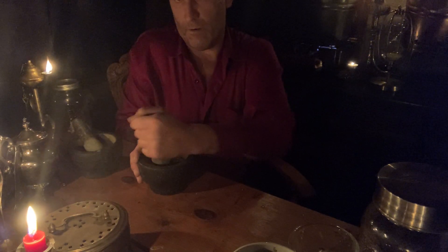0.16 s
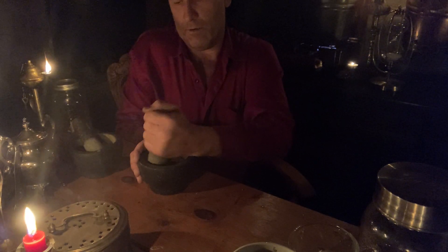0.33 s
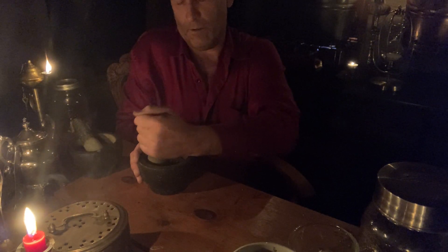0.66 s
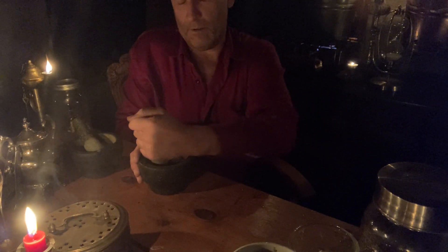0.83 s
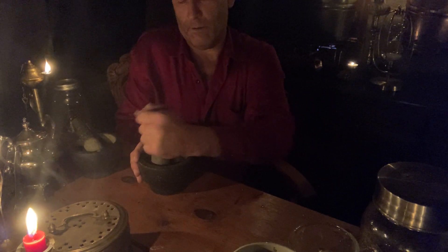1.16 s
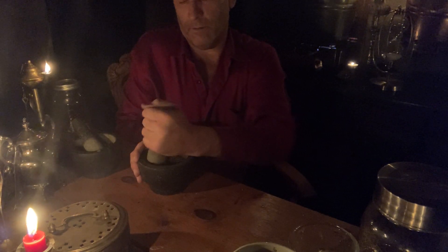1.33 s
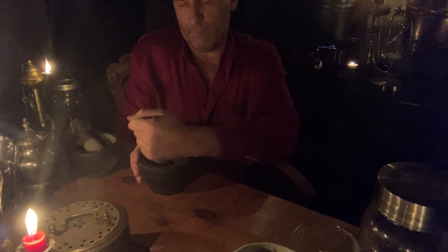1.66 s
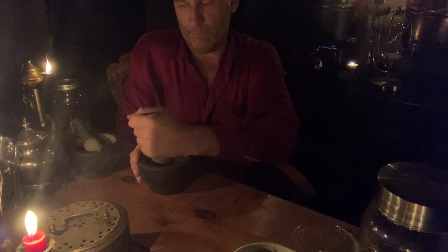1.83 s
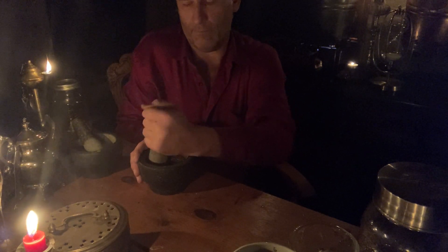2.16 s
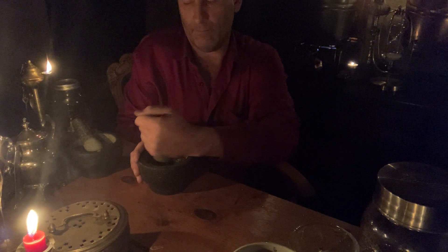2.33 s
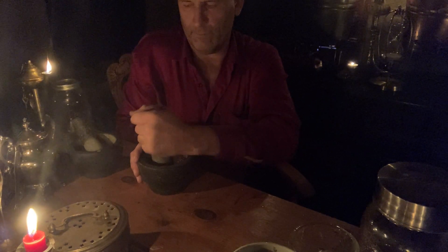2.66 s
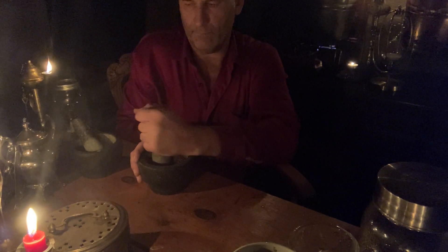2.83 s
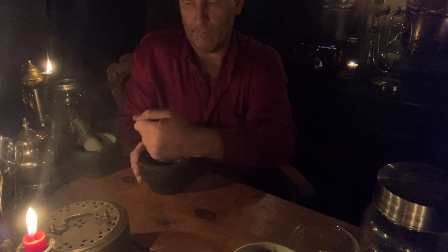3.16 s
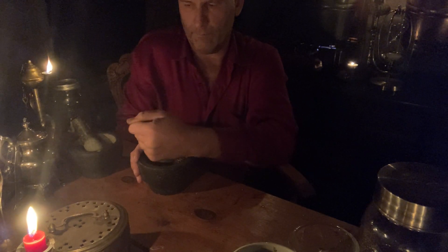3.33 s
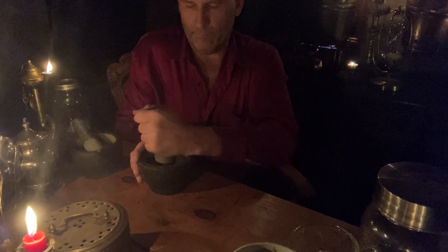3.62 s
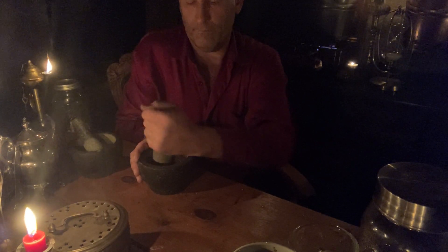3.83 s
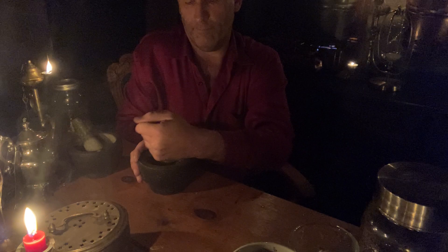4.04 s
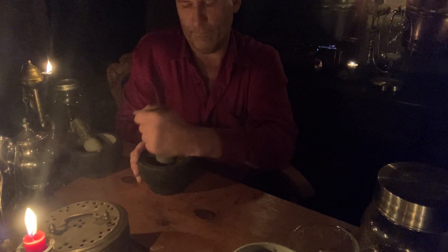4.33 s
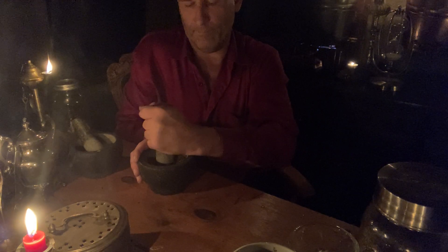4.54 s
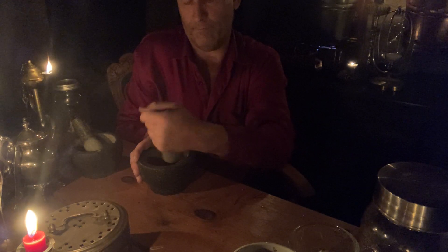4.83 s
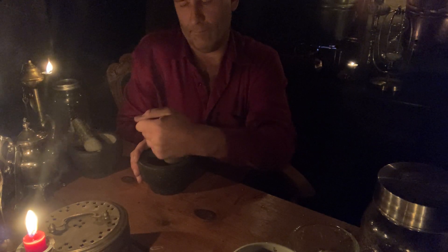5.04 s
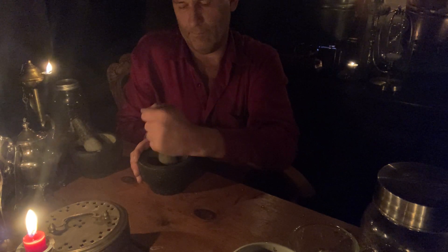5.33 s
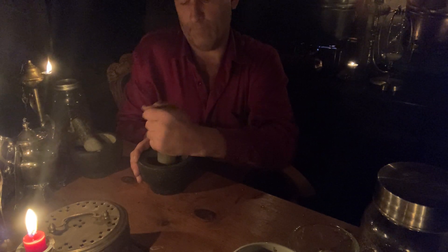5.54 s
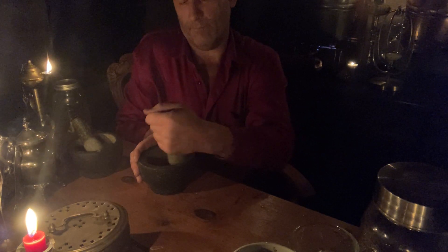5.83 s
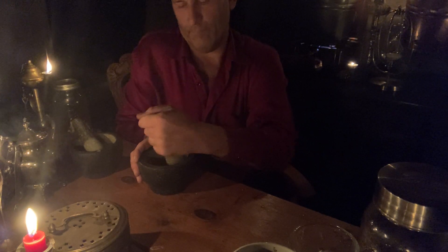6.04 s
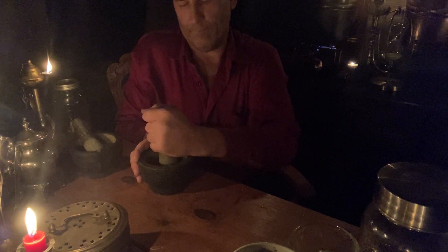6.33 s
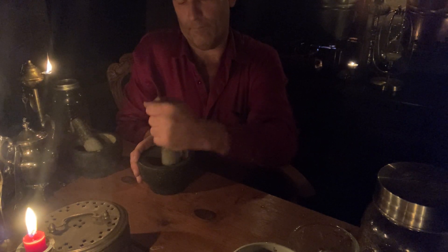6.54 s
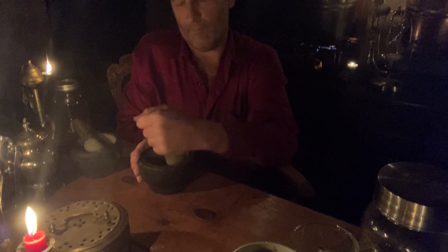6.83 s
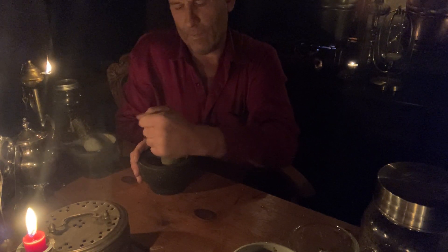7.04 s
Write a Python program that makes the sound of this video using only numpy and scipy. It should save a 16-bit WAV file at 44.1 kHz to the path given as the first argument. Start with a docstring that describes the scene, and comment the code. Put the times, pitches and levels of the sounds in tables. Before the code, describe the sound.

Close, dry grinding of brittle spice under a heavy stone pestle, in irregular pushes with short gaps. Each push brings coarse scraping, fine crackle and a low table rumble. Dull bumps and occasional stone clacks with quick rebounds interrupt it, sharpest around five and six seconds and in a clattering cluster near the end. Brief high stony squeaks appear. Small quiet room, soft air and faint high hiss.

```python
"""Grinding spice in a stone mortar

A stone pestle grinds dry spice in a stone mortar on a wooden table, in uneven strokes, in a quiet room.
Tiny slips shake the mortar and the table top, crushed powder crackles, and bare stone makes the pestle sing.
Now and then the pestle knocks on the bowl and rebounds, or a seed cracks; room air and a faint hiss lie under it.
Slips and breaking grains are random tiny blows, played through rings and short bursts of shaped noise."""
import sys
import numpy as np
from scipy import signal
from scipy.fft import rfft, irfft
from scipy.io import wavfile
from scipy.ndimage import uniform_filter1d

SR = 44100
rng = np.random.default_rng(int(sys.argv[2]) if len(sys.argv) > 2 else 0)


def to_wav(sig):
    """Store sig (one row per channel, or 1-D mono) as 16-bit WAV at the path in sys.argv[1].

    Samples outside -1..1 are clipped; the rate is SR.
    """
    pcm = np.clip(np.atleast_2d(sig), -1, 1) * 32767
    pcm = np.round(pcm).astype(np.int16)
    wavfile.write(sys.argv[1], SR, pcm.T)  # frames by channels


N = 316638  # length of the scene in samples
RING_N = 32768  # length of one ring in samples
TIME = np.arange(N) / SR  # seconds since the start of the scene
AGE = np.arange(RING_N) / SR  # seconds since a blow

# The pestle's own bending modes. Each row: pitch in Hz, relative level in dB, time to fall by 60 dB in seconds.
PESTLE_MODES = [(4155, -3.5, 0.15), (4190, 3, 0.11), (8900, -23, 0.079)]


def grinding(table, bowl):
    """Slips under pressure shake the table, coarse grit rattles the bowl, and powder crackles as it is crushed."""
    pressure, grit, crushing = effort()
    catch = uneven(rate=62, depth_db=3.0)
    slips = grains(rate=480, spread_db=4.5) * catch
    breaking = grains(rate=2400, spread_db=1.0) * catch

    shaking = undb(-2.0) * driven(slips * pressure, thud(table))
    rattle = undb(-1.5) * driven(slips * grit, clack(bowl, hard_hz=1750))
    crackle = undb(1.0) * driven(breaking * crushing, snap())

    # the arm's weight rocks the whole table: a low rumble that follows the pressure
    rumble = [(15, -20), (45, 2.5), (75, -9), (115, -1), (170, 0), (300, -57.5)]  # Hz, relative dB
    sway = noise(rumble, width=0.42, size=N) * (pressure / undb(-51)) ** 0.75
    return shaking + rattle + crackle + undb(-58.0) * sway


def effort():
    """Pressure on the spice, and the grit rattle and crushing that go with it, as gains over time."""
    # The pestle bears down on the spice.
    # Each row: start in seconds, length in seconds, pressure in dB, change of pressure by the end in dB.
    strokes = [(0.0, 0.16, -50, 0), (0.305, .02, -57, -0.5), (0.537, 0.14, -51.5, 4.5),
               (0.817, 0.31, -49, -1), (1.182, 0.021, -53, -0.5), (1.429, 0.12, -47, -2),
               (1.678, 0.39, -53, 3), (2.636, 0.21, -47, -7), (3.395, 0.25, -49.5, 1.5),
               (3.72, 0.068, -56.5, 2), (4.291, 0.22, -45.5, -2.5), (4.66, 0.15, -61.5, -12),
               (5.121, .33, -52, 5), (6.05, .03, -50.5, -3), (6.212, 0.27, -43, -20.5),
               (6.99, 0.16, -47.5, -2.5)]
    # The pestle skims lightly along the wall.
    # Each row: start in seconds, length in seconds, grit level in dB, change by the end in dB.
    skims = [(2.138, 0.27, -60.5, -10)]
    # The pestle bites into a heap of unbroken spice. Each row: time of the peak in seconds, level in dB.
    bites = [(0.0, -56), (.82, -54), (1.67, -56.5), (2.655, -56), (3.42, -61.5), (3.59, -63.5),
             (4.31, -56.5), (5.16, -59.5), (5.291, -56), (6.05, -61.5), (6.21, -55), (7.04, -58)]
    press_attack_s, press_release_s = 0.075, 0.066  # time to rise or fall by 20 dB
    bite_attack_s, bite_release_s = 0.14, 0.12  # time to rise or fall by 20 dB
    resting_db = -72  # the pestle's own weight, always there
    grit_db, powder_db = -11.5, -19  # grit rattle and crackle of ground powder, relative to the pressure

    pressing = [swell(*row, press_attack_s, press_release_s) for row in strokes]
    pressure = undb(resting_db) + np.max(pressing, axis=0)
    skimming = sum(swell(*row, press_attack_s, press_release_s) for row in skims)
    biting = np.max([swell(s, 0, db, 0, bite_attack_s, bite_release_s) for s, db in bites], axis=0)

    grit = np.hypot(undb(grit_db) * pressure, skimming)
    crushing = np.hypot(undb(powder_db) * pressure, biting)
    return pressure, grit, crushing


def uneven(rate, depth_db):
    """The pestle catches and slides: a gain that wanders many times a second."""
    steps = rng.standard_normal(N // 100)
    gain = undb(depth_db * np.interp(TIME * rate, np.arange(len(steps)), steps))
    return gain / rms(gain)


def swell(s, length, db, change_db, attack, release):
    """Gain of one gesture: it rises, holds with a steady drift, and dies away."""
    held = np.clip((TIME - s) / max(length, .001), 0, 1)  # 0 at the start, 1 at the end
    before = np.maximum(s - TIME, 0) / attack
    after = np.maximum(TIME - s - length, 0) / release
    return undb(db + change_db * held - 20 * (before + after))


def singing(pestle):
    """Stick and slip on bare stone keeps the pestle's modes going."""
    # Bare stone rubs on stone.
    # Each row: start in seconds, length in seconds, level in dB relative to the other rubs.
    rubs = [(0.475, .008, -66), (0.52, 0.034, -64), (0.614, 0.076, -61), (1.435, 0.016, -62),
            (1.474, 0.043, -66.5), (5.925, .005, -52), (6.8, .07, -61.5)]
    attack_s, release_s = 0.013, 0.018  # time to rise or fall by 20 dB
    rub = sum(swell(s, length, db, 0, attack_s, release_s) for s, length, db in rubs)
    slips = grains(rate=430, spread_db=2.5)
    return undb(5.5) * driven(slips * rub, ring(pestle))


def knocks(table, bowl, pestle):
    """Each blow rings table, bowl and pestle; a breaking seed lets the pestle drop with a small thud."""
    # The pestle knocks on the bowl and rebounds. Each row: start in seconds, thud in dB, clack in dB,
    # hardness of the contact as a corner in Hz, thud of the rebound in dB. Levels are before the trims in blow().
    hits = [(.436, -59, -46.5, 1700, -58), (.458, -30.5, -49, 1090, -40.5), (1.443, -35.5, -43, 1680, -48),
            (1.501, -48, -42.5, 1690, -34.5), (2.381, -54, -31, 1830, -30.5),
            (3.190, -30, -34.5, 1420, -54), (3.388, -45, -47, 1250, -42.5), (4.973, -17, -22, 2320, -22),
            (5.283, -34, -40, 2080, -39), (5.931, -25, -26, 4670, -22), (6.529, -41, -40.5, 1170, -43),
            (6.772, -32.5, -31, 3400, -26), (6.829, -30.5, -41.5, 1500, -39),
            (6.856, -19.5, -26.5, 1400, -29), (6.876, -16.5, -24.5, 2870, -25),
            (6.895, -21.5, -28.5, 2580, -42)]
    # The pestle lurches over a coarse grain and lands cushioned.
    # Each row: start in seconds, thud in dB before the trim in blow().
    bumps = [(.146, -37.5), (.921, -41), (1.078, -31.5), (1.708, -35), (2.011, -38), (2.036, -41.5),
             (2.408, -28.5), (2.667, -33.5), (3.624, -40.5), (4.410, -34.5), (5.41, -36.5), (5.449, -33),
             (5.638, -42), (6.323, -36), (6.639, -38)]
    # Seeds crack under the pestle. Each row: start in seconds, level of the snap in dB, pestle ring in dB.
    cracks = [(1.618, -47.5, -66), (1.7089, -36, -58), (4.097, -46, -51), (4.262, -58, -70),
              (5.282, -59, -71)]
    rebound_s, rebound_hardness = .012, 0.91  # delay; share of the first hardness
    rebound_clack_db, bump_clack_db = -10.5, -18  # clack relative to its thud, before the trims
    bump_hard_hz = 1140

    def blow(thud_db, clack_db, hard_hz):
        """One contact; the softer it is, the less it reaches up to the pestle's note."""
        note_hz = PESTLE_MODES[0][0]
        reach = undb(-1) / np.hypot(1, (note_hz / hard_hz) ** 3)
        stone = clack(bowl, hard_hz) + reach * ring(pestle)
        return undb(thud_db - 7) * thud(table) + undb(clack_db - 3.5) * stone

    out = np.zeros((2, N))
    for s, thud_db, clack_db, hard_hz, rebound_db in hits:
        add(out, s, blow(thud_db, clack_db, hard_hz))
        rebound = blow(rebound_db, rebound_db + rebound_clack_db, hard_hz * rebound_hardness)
        add(out, s + rebound_s, rebound)
    for s, db in bumps:
        add(out, s, blow(db, db + bump_clack_db, bump_hard_hz))
    for s, db, ring_db in cracks:
        crack = snap() + undb(-5.5) * thud(table)
        add(out, s, undb(db) * crack + undb(ring_db) * ring(pestle))
    return out


def thud(waves):
    """The table top answers a push on the mortar."""
    return placed(struck(strike(waves, scatter_db=1.0, width=0.23)), pan_db=0.9)


def clack(bowl, hard_hz):
    """Stone meets stone: a crack, the ring of bowl and board, then the room; spice in between softens the contact."""
    # Dense higher modes of bowl and board, as noise. Each row: pitch in Hz, relative level in dB.
    dense_modes = [(300, -16), (600, 9), (900, 2.5), (1300, 1.5), (1900, 1), (2600, -3), (3600, -7.5),
                   (5000, -17), (9000, -35)]
    direct = noise(dense_modes, width=0.32, size=RING_N) * (fade(0.0089) + undb(-7.5) * fade(0.15))
    room_swell = fade(0.3) * (1 - fade(0.034))  # the room answers a little later
    room = undb(-12.5) * noise(dense_modes, width=1.0, size=RING_N) * room_swell
    modes = undb(-7) * struck(strike(bowl, scatter_db=1.5, width=0.62))
    contact = signal.butter(3, min(hard_hz, SR / 3), fs=SR, output="sos")  # a soft contact dulls the sound
    return placed(struck(signal.sosfilt(contact, direct + room + modes)), pan_db=-3.5)


def ring(waves):
    """The pestle rings, damped by the fist; the room holds the note a little longer."""
    note = [(3600, -44), (3980, -5), (4170, 1), (4380, -27), (4700, -37)]  # Hz, relative dB
    room = undb(-7.5) * noise(note, width=0.44, size=RING_N) * fade(0.19)
    direct = struck(strike(waves, scatter_db=3.5, width=0.27))
    return placed(struck(direct + room), pan_db=-2.2)


def snap():
    """A brittle grain breaks: a sharp tick and a faint room tail."""
    # Colour of breaking spice. Each row: pitch in Hz, relative level in dB.
    crunch = [(500, 10.5), (1500, -20), (3400, 9.5), (5000, 2), (7000, 1), (10000, 0.5), (14000, -38),
              (16000, -27)]
    tick = noise(crunch, width=0.95, size=RING_N) * fade(0.0025)
    tail = undb(-24.5) * noise(crunch, width=0.4, size=RING_N) * fade(0.17)
    return struck(tick + tail)


def room_air():
    """The still air of the room: steady, wide, shaped noise."""
    # Colour of the room air. Each row: pitch in Hz, relative level in dB per Hz.
    air_colour = [(20, -2), (45, 1), (140, -17), (290, -1.5), (480, -8), (660, -1), (880, -21.5),
                  (1150, -18.5), (1450, -9), (1720, 0.5), (2050, -12), (2600, -21.5), (5600, -15.5),
                  (7000, -25)]
    return undb(-63) * noise(air_colour, width=1.0, size=N)


def hiss():
    """One thin electronic hiss, shared by both channels, with a phase difference that varies with pitch."""
    # Colour of the microphone hiss. Each row: pitch in Hz, relative level in dB per Hz.
    hiss_colour = [(5000, -40), (7400, -22), (8800, -12), (9500, -1), (10000, 0), (10800, -11),
                   (11800, -15), (14000, -11), (16000, -20)]
    # Phase difference between left and right. Each row: pitch in Hz, phase difference in radians.
    phase_table = [(5000, 0.2), (8350, 6.0), (9800, 7.7), (13200, 12.0), (14400, 13.0), (15800, 15.5)]
    left = noise(hiss_colour, width=0, size=N)[0]
    hz = np.arange(N // 2 + 1) * SR / N
    phase = np.interp(hz, *np.transpose(phase_table))
    right = irfft(rfft(left) * np.exp(-1j * phase), N)
    return undb(-57.5) * np.array([left, right])


def mode_waves(modes, cycles):
    """One complex ring per mode; each needs some cycles to build up, so the lows come late."""
    waves = []
    for hz, db, t60 in modes:
        build_up = 1 - np.exp(-AGE * hz / cycles)
        waves.append(undb(db) * fade(t60) * build_up * np.exp(2j * np.pi * hz * AGE))
    return np.array(waves)


def strike(waves, scatter_db, width):
    """Each contact point weights the modes differently; each side gets its own phase."""
    size, turn = rng.standard_normal((2, len(waves)))
    phase = 2 * np.pi * rng.random(len(waves)) + width * np.array([turn, -turn])
    weights = undb(scatter_db * size) * np.exp(1j * phase)
    return (weights @ waves).imag


def grains(rate, spread_db):
    """Random tiny blows, about rate per second, many weak and a few strong, at level 1."""
    size = undb(spread_db * np.minimum(rng.exponential(size=N), 4))
    happens = rng.random(N) < rate / SR
    x = happens * size * rng.choice([-1, 1], N)
    return x / rms(x)


def driven(force, response):
    """A train of tiny blows played through a response, which is scaled to keep the level of the train."""
    x = signal.fftconvolve(force[None], response, axes=1)[:, :N]
    return x / np.sqrt(np.sum(response ** 2) / 2)


def noise(spectrum, width, size):
    """Stereo noise of a given spectrum; width is side over mid, and the bass stays nearer the middle."""
    hz, db = np.transpose(spectrum)
    f = np.arange(size // 2 + 1) * SR / size + 1  # the 1 avoids the logarithm of zero
    colour = undb(np.interp(np.log(f), np.log(hz), db))
    mid, side = rfft(rng.standard_normal((2, size))) * colour
    side = side * width * np.clip(f / 900, .3, 1)
    x = irfft(np.array([mid + side, mid - side]), size)
    return x / rms(x)


def struck(x):
    """Scale a ring so that its loudest 5 milliseconds near the start have level 1."""
    power = np.mean(x[:, :4096] ** 2, axis=0)
    return x / np.sqrt(uniform_filter1d(power, size=220).max())


def fade(t60):
    """Exponential decay over the length of a ring, by 60 dB in t60 seconds."""
    return np.exp(-np.log(1000) * AGE / t60)


def placed(x, pan_db):
    """Lean a sound left (plus) or right (minus)."""
    return x * undb(np.array([[pan_db], [-pan_db]]) / 2)


def add(out, s, x):
    """Mix a stereo sound in at time s."""
    i = max(int(s * SR), 0)
    out[:, i:i + x.shape[1]] += x[:, :N - i]


def undb(db):
    """Decibels to gain."""
    return 10 ** (np.asarray(db) / 20)


def rms(x):
    """Root mean square."""
    return np.sqrt(np.mean(x ** 2))


def scene():
    """Mortar work over the still air of the room and the hiss."""
    # Mortar and table top ring together.
    # Each row: pitch in Hz, relative level in dB, time to fall by 60 dB in seconds.
    table_modes = [(65, -20.5, 0.88), (103.3, -13.5, 0.4), (125, -11, 0.33), (195.6, -6.5, 0.15),
                   (233.5, -12, 0.26), (258.8, 3.5, 0.12), (287.2, -1.5, 0.18), (314.7, -2, 0.15),
                   (374, -3.5, 0.12), (402, -2.5, 0.13), (506.5, -12.5, 0.12), (570, -10.5, 0.19),
                   (659.5, -13.5, 0.11), (819.7, -17.5, 0.12), (899, -12, 0.11)]
    # Higher modes of the bowl on its board.
    # Each row: pitch in Hz, relative level in dB, time to fall by 60 dB in seconds.
    bowl_modes = [(825, 0, 0.18), (965, -4.5, 0.17), (1073, -10, 0.089), (1176, -5, 0.17),
                  (1225, -3.5, 0.16), (1321, 5, 0.11), (1504, -0.5, 0.11), (1642, 1, 0.12),
                  (1900, -3, 0.096), (2116, 1, 0.14), (2370, -6.5, 0.084), (2780, -8.5, 0.17)]
    table = mode_waves(table_modes, cycles=0.48)
    bowl = mode_waves(bowl_modes, cycles=0.43)
    pestle = mode_waves(PESTLE_MODES, cycles=1.7)

    mortar_work = grinding(table, bowl) + singing(pestle) + knocks(table, bowl, pestle)
    return mortar_work + room_air() + hiss()


def record(dry):
    """The recorder cuts the top: a steep low-pass filter at 15750 Hz."""
    return signal.sosfilt(signal.ellip(10, .2, 80, 15750, fs=SR, output="sos"), dry)


dry = scene()
out = record(dry)
to_wav(out)
```